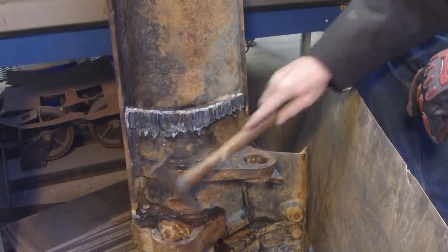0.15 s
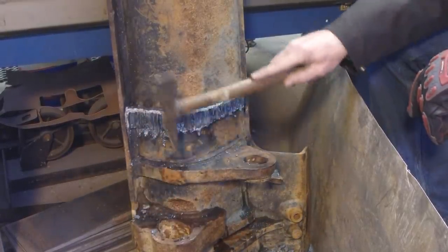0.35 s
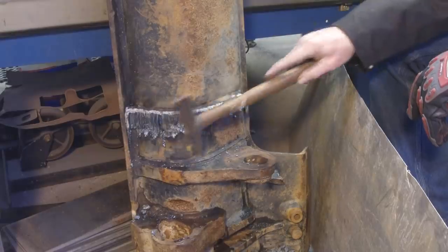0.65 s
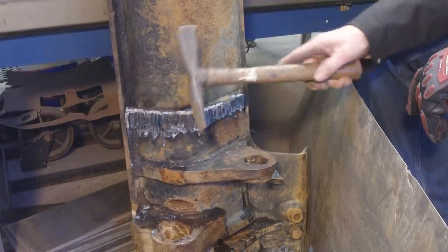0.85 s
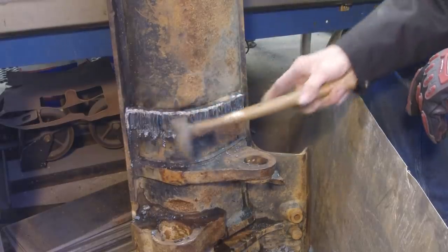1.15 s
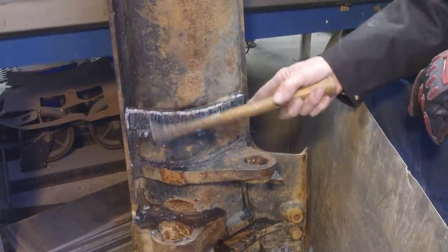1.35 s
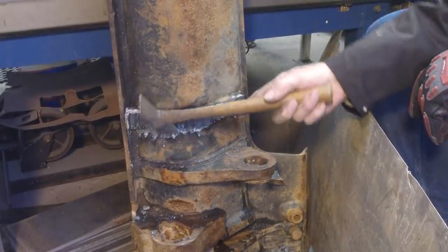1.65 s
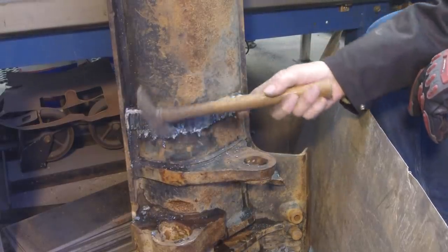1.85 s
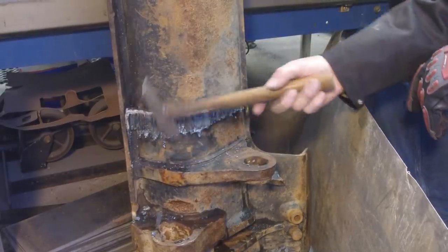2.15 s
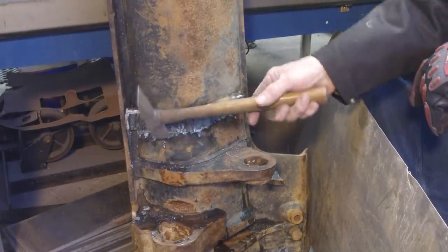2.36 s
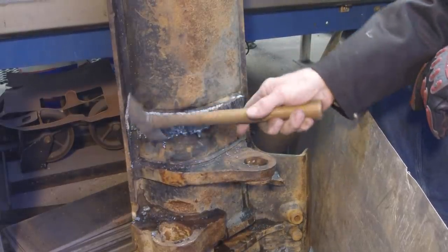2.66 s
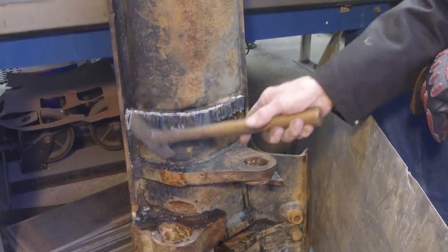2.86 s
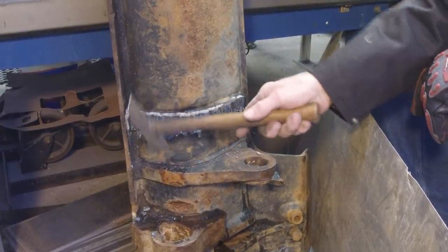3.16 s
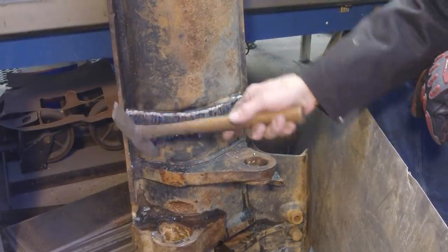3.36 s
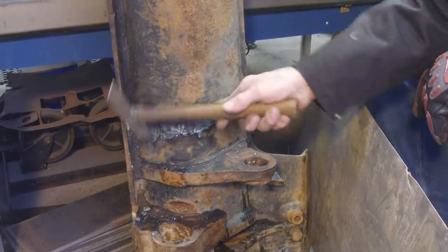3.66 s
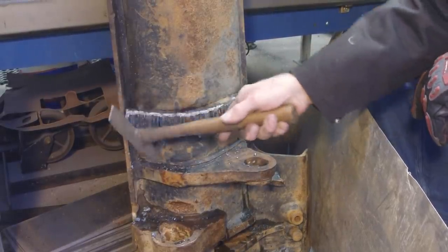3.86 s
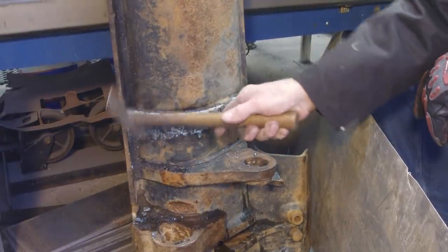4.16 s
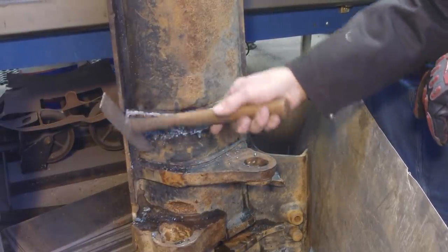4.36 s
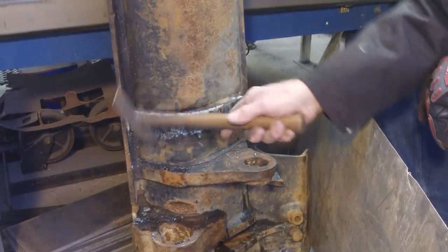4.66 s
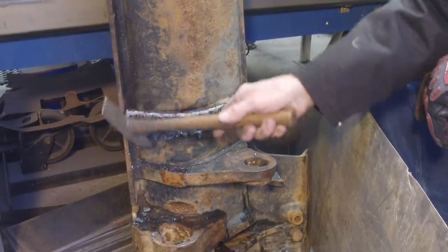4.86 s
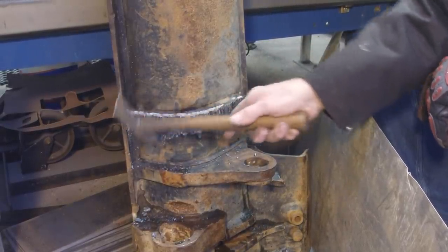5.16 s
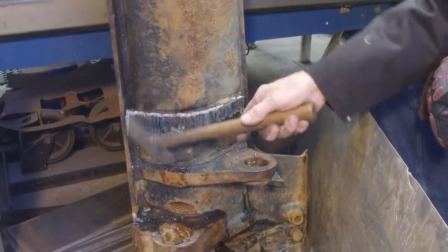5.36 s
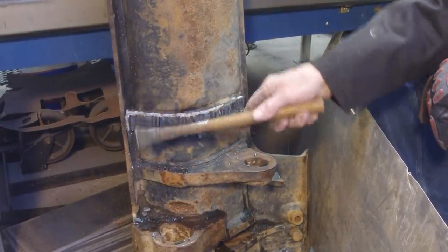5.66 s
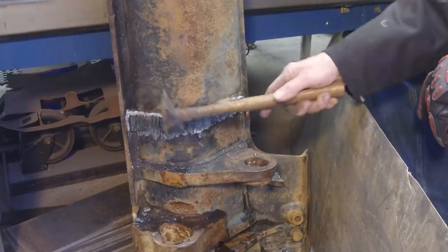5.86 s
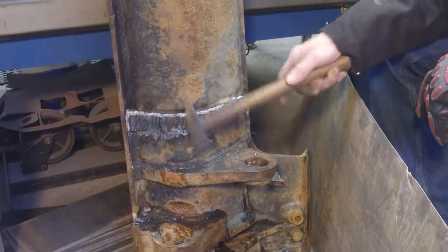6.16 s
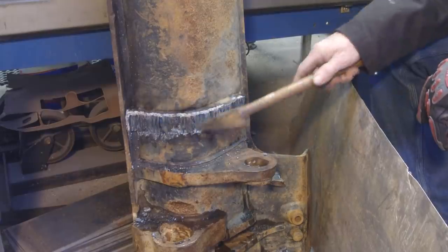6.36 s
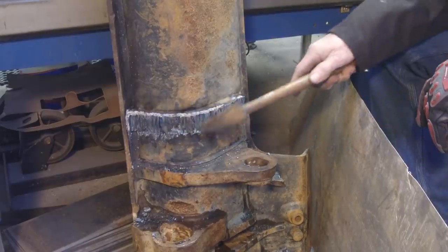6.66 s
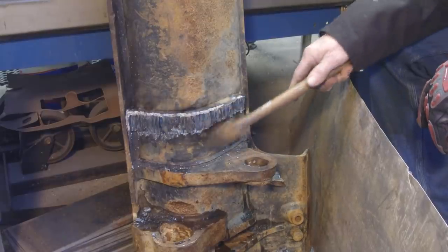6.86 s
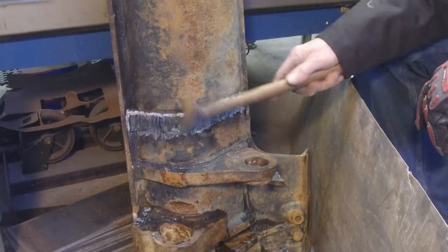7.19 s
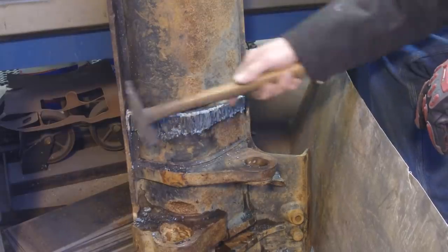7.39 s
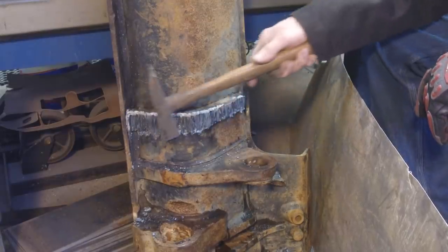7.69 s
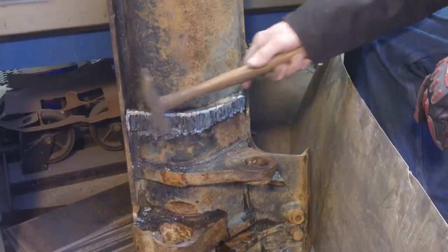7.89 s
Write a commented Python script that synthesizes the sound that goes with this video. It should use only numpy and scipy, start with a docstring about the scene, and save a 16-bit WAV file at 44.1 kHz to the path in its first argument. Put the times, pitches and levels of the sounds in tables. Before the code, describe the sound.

In a machine shop with low motor hum, a pointed chipping hammer strikes a thick steel pipe. A few loud, spaced clangs come first, then quick, brighter taps about four a second with small rebounds and crumbling slag. Louder, fuller blows follow with snapping chips and a spray of grit, and finally the point rattles and scrapes along the seam. Close single microphone.

```python
"""Chipping hammer on a welded steel pipe

A chipping hammer taps slag off a weld round a thick pipe in a machine shop, then is dragged along the seam.
Clicks drive the ringing modes of flange, pipe and hammer head; noise bands make the clang and crushed slag.
Dying noise bursts make chips and sprays of grit, uneven random clicks make the scrape.
Broad noise and a wavering low motor hum fill the shop, and the hum swells after each blow."""
import sys
import numpy as np
from scipy import signal
from scipy.io import wavfile

SR = 44100
rng = np.random.default_rng(int(sys.argv[2]) if len(sys.argv) > 2 else 0)


def materialize(psi):
    """Save the field psi as 16-bit PCM at rate SR to the path in sys.argv[1].

    A 1-D psi becomes a single channel; in a 2-D psi each row is a channel.
    """
    bounded = np.clip(np.atleast_2d(psi).T, -1, 1)
    quanta = np.round(bounded * 32767).astype(np.int16)
    wavfile.write(sys.argv[1], SR, quanta)


N = 354123

# every blow and rebound of the point: (time [s], force as pipe ring [dB], brightness as crack over ring [dB],
# head first modes [dB], head upper modes [dB], crushed slag [dB], thud [dB])
BLOW_TABLE = [(0.132, -41, 5, -45.5, -46, -27, -35), (0.2526, -13.5, -9.5, -38.5, -39, -69, -29.5),
              (0.6731, -9.5, -6, -30.5, -30.5, -17, -17), (0.814, -37.5, 7, -45, -62, -69, -36),
              (1.3613, -7.5, -7.5, -19.5, -28, -21, -18.5), (1.4178, -17.5, 2, -43, -32.5, -47, -40),
              (1.4353, -29, 13, -25.5, -47, -43, -50), (1.6015, -11, 0, -23.5, -32, -40, -23.5),
              (1.849, -21.5, 1, -30.5, -31, -31, -26.5), (2.1229, -15.5, -6.5, -29, -35.5, -43, -23.5),
              (2.161, -36, 16, -25, -32, -26, -33), (2.3788, -21.5, 13.5, -20, -40, -55, -30.5),
              (2.4496, -29.5, -21, -37, -50, -60, -27), (2.673, -24, 3.5, -30.5, -30, -22, -24),
              (2.9326, -14.5, 5.5, -27, -28.5, -20.5, -20.5), (2.9715, -15, -3.5, -42, -50, -53, -23),
              (3.1945, -15.5, -2.5, -39, -35, -35, -25.5), (3.2249, -19, 11, -36, -34, -40, -25.5),
              (3.4254, -17, -2.5, -30, -32.5, -35, -25.5), (3.4663, -17, -2.5, -31.5, -36.5, -25, -20),
              (3.686, -16, 8, -32, -28.5, -24, -27.5), (3.7184, -14, -4.5, -29.5, -31, -42, -22),
              (3.7269, -34, 6, -31.5, -49, -39, -24.5), (3.9206, -15.5, 8, -30.5, -30.5, -36, -26.5),
              (3.9909, -23.5, 8.5, -37, -42, -47, -28), (4.151, -23, 6, -30.5, -33.5, -53, -27.5),
              (4.4155, -15.5, 5.5, -32, -30.5, -39, -25), (4.6541, -16, 6, -26, -29.5, -53, -23.5),
              (4.9015, -15, 3, -28.5, -29, -23, -21.5), (5.1816, -13, 4.5, -32, -35, -46, -22),
              (5.2206, -26, 15.5, -49, -38, -48, -33), (5.2599, -26.5, 4, -35.5, -59, -55, -31.5),
              (5.4565, -20.5, 0.5, -32.5, -46, -49, -26.5), (5.4795, -18, 2.5, -39, -35, -29, -31),
              (5.533, -20.5, -1.5, -45, -63, -69, -25.5), (5.7304, -20.5, -6, -28.5, -36.5, -19, -23.5),
              (6.0228, -26, -3, -33, -45, -40, -28.5), (6.03, -23, 3, -21.5, -28.5, -26, -29),
              (6.3223, -42, 5, -35, -33.5, -25, -33), (6.3312, -18, 4, -26.5, -31, -22, -26),
              (6.652, -7, -11, -31.5, -40, -44, -17), (6.9166, -7, -1.5, -19, -34.5, -52, -16.5),
              (7.1723, -10.5, -2.5, -21, -26, -53, -17), (7.233, -20.5, 0.5, -49, -52, -35, -41),
              (7.3956, -33, -16, -33, -37, -57, -34), (7.418, -27, -5, -35, -41, -57, -32),
              (7.4308, -29, 3, -29.5, -39, -50, -37), (7.4594, -25.5, -5, -34, -34, -43, -34),
              (7.4908, -32.5, 11, -61, -48, -55, -31.5), (7.5478, -43, 23, -62, -33.5, -53, -34),
              (7.6644, -22, -1.5, -50, -51, -62, -39), (7.6958, -27.5, 8, -36, -31.5, -51, -33),
              (7.7615, -16, -4.5, -42, -38, -52, -30), (7.858, -23.5, -12, -38, -42, -62, -34.5),
              (7.8961, -24, -5, -36.5, -33.5, -53, -28.5), (7.957, -28.5, 2, -33, -35, -59, -37)]
# brittle chips snapping off or landing: (time [s], level [dB])
CHIP_TABLE = [(1.485, -35), (2.502, -33), (5.1075, -38), (6.331, -15.5), (6.397, -23), (6.941, -22.5),
              (7.1172, -56), (7.215, -25)]
# slag crusts bursting into sprays of grit: (time [s], level [dB], t60 [s])
SPRAY_BURSTS = [(2.159, -29, 0.068), (3.708, -30.5, 0.12), (3.961, -34, 0.13), (4.1644, -43.5, 0.35),
                (4.4363, -34, 0.13), (4.6828, -36.5, 0.23), (5.8371, -49.5, 0.17), (6.726, -29.5, 0.53),
                (7.4889, -46, 0.13), (7.7064, -44, 0.35)]
# colour of the grit: (frequency [Hz], level [dB per Hz])
GRIT_SPECTRUM = [(1470, -37), (2500, -14), (3080, 14.5), (3720, 14.5), (13500, 14.5), (15600, -8),
                 (16000, -32)]
# pressure of the point dragged along the seam: (time [s], level [dB])
DRAG_PRESSURE = [(7.38, -62), (7.506, -41), (7.622, -45.5), (7.728, -37), (7.83, -49), (8.03, -47)]
# ringing modes of the pipe wall: (frequency [Hz], level [dB], t60 [s])
PIPE_MODES = [(241.7, -14.5, 0.24), (291.7, -8.5, 0.25), (364.5, -11.5, 0.53), (549.6, -13, 0.46),
              (580.8, -7, 0.21), (653, -7, 0.15), (697.5, -7, 0.28), (722.5, -10.5, 0.46), (781, -17, 0.54),
              (973, -9.5, 0.11), (1077, -10, 0.12), (1124, -6.5, 0.16), (1208, -13, 0.22),
              (1262, -21, 0.37), (1500, -10.5, 0.25), (1594, -17, 0.4), (1656, -10, 0.19),
              (1752, -6.5, 0.11), (1801, -10.5, 0.27), (1878, -10.5, 0.094), (1935, -10, 0.13),
              (2200, -38, 0.083), (2153, -13, 0.18), (2202, -13.5, 0.093), (2344, -16, 0.13),
              (2395, -10, 0.12), (2560, -18.5, 0.065), (2768, -20.5, 0.14), (3872, -20, 0.088)]
# ringing modes of the flange, lower down, where the first blows land: (frequency [Hz], level [dB], t60 [s])
FLANGE_MODES = [(360, -6.5, 0.59), (564.5, -4, 0.21), (722, -8.5, 0.43), (762, -11, 0.38), (962, -4, 0.22),
                (1053, -9, 0.055), (1117, 0, 0.19), (1260, -36, 0.11), (1500, -16, 0.41), (1798, -12, 0.27),
                (2320, -13, 0.12), (2554, -4.5, 0.065), (3830, -3.5, 0.027)]
# hammer head modes, the first ones in a beating cluster: (frequency [Hz], level [dB], t60 [s])
HEAD_MODES = [(4160, -18, 0.045), (4750, -33, 0.068), (4490, -5, 0.1), (4561, -3, 0.11), (4616, -16, 0.094),
              (7755, -5, 0.076), (7885, -15.5, 0.049), (8760, -5, 0.028), (9230, -13.5, 0.058),
              (13450, -4.5, 0.037)]
# dense overtones of pipe, flange and shop that blur into noise: (frequency [Hz], level [dB per Hz])
CLANG_SPECTRUM = [(120, 3.5), (400, 8.5), (1000, -1), (2000, -4), (3200, -14), (4200, -11), (6000, -11),
                  (11000, -19.5), (15000, -16)]
# how long those overtones last: (frequency [Hz], t60 [s])
CLANG_DECAY = [(100, 0.58), (420, 0.48), (1100, 0.31), (2900, 0.32), (7700, 0.16), (15000, 0.055)]
# colour of the shop noise: (frequency [Hz], level [dB per Hz])
SHOP_SPECTRUM = [(15, -46), (25, -34), (102, 11.5), (170, -9.5), (373, -4.5), (489, -12), (714, -4.5),
                 (840, -11.5), (1130, -18.5), (3340, -29.5), (4610, -32.5), (5280, -32), (13600, -33.5),
                 (15200, -40), (16000, -60)]
# resonances of the motor hum: (frequency [Hz], width [Hz], level within the hum [dB])
HUM_RESONANCES = [(82.84, 3.1, -6.5), (106.2, 4.2, -7.5), (120.84, 2.6, -3), (211.5, 7.9, -9.5)]
# level of the low hum before the blows swell it: (time [s], level [dB])
HUM_CURVE = [(0, -35), (0.1, -53), (0.16, -30.5), (0.5, -44.5), (1.3, -43.5), (1.37, -37), (1.66, -35),
             (1.76, -46.5), (1.92, -38.5), (2.5, -41.5), (5.0, -42.5), (8.03, -45)]

SHOP_DB = -45  # rms of the broad shop noise
BOOM_DB, BOOM_T60_S = -16, 0.66  # each blow shakes the bench, which booms on the hum's pitches
FLANGE_UNTIL_S = 1.0
ECHO_T60_S = 0.28
KNOCK_FOLLOWS = 0.36  # share of the brightness that the contact knock gains on top
HIGH_DB, HIGH_FOLLOWS = -3.5, 0.32  # the high pipe modes follow a share of the brightness
TOP_DB, TOP_SLAG_SHARE = -7.5, 0.33  # the top head mode leans from the upper modes toward the slag
CUTOFF_HZ = 16500


def amp(db):
    """Decibels to gain."""
    return 10 ** (np.asarray(db) / 20)


def rms_one(x):
    """Scaled to rms 1."""
    return x / np.sqrt(np.mean(x ** 2) + 1e-20)


def at_hz(points, hz):
    """A table over frequency, read on a log-frequency axis."""
    table = np.array(points)
    return np.interp(np.log(hz), np.log(table[:, 0]), table[:, 1])


def clicks(times, sizes):
    """One sample per event, over a silent floor."""
    out = np.full(N, 1e-18)
    samples = (np.asarray(times) * SR).round().astype(int)
    np.add.at(out, np.minimum(samples, N - 1), sizes)
    return out


def fade(drive, t60):
    """Each click becomes an exponential fall that loses 60 dB in t60 seconds."""
    return signal.lfilter([1], [1, -amp(-60 / (t60 * SR))], drive)


def ring(drive, hz, t60):
    """A unit click sets a dying sine of starting height 1 ringing in a two-pole resonator."""
    r, w = amp(-60 / (t60 * SR)), 2 * np.pi * hz / SR
    return signal.lfilter([0, np.sin(w)], [1, -2 * r * np.cos(w), r * r], drive)


def dying(times, db, t60):
    """Envelope that jumps at each event and falls; powers of overlapping tails add."""
    power = fade(clicks(times, amp(db) ** 2), t60 / 2)  # power drops twice as many dB on this scale
    return np.sqrt(power)


def narrow(hz, width_hz):
    """Noise in one narrow resonance, rms 1."""
    t60 = np.log(1000) / (np.pi * width_hz)
    return rms_one(ring(rng.standard_normal(N), hz, t60))


def bands(envelope_at, low_hz):
    """Half-octave noise bands, each under the envelope that envelope_at(Hz) gives per Hz."""
    edges = low_hz * 2 ** np.arange(0, np.log2(19000 / low_hz), 0.5)
    white = rng.standard_normal((2, N))  # neighbouring bands take different noise
    out = 0
    for k, (low, high) in enumerate(zip(edges, edges[1:])):
        sos = signal.butter(2, [low, high], "band", fs=SR, output="sos")
        out = out + signal.sosfilt(sos, white[k % 2] * envelope_at(np.sqrt(low * high)))
    return out


def blow_db(hz):
    """Strength of every blow near one frequency: where and how the point lands sets the balance."""
    _, force, bright, _, _, crushed, thud = np.transpose(BLOW_TABLE)
    levels = [thud, force, force + HIGH_DB + HIGH_FOLLOWS * bright, force + bright, crushed]
    anchors_hz = [500, 1100, 1900, 3800, 11000]
    place = np.interp(np.log(hz), np.log(anchors_hz), np.arange(5))
    k = min(int(place), 3)
    return levels[k] + (place - k) * (levels[k + 1] - levels[k])


def strikes(s, db, signs, echo_db):
    """One click a blow, then a fading noise: reflections and chatter feed the ring and make it flutter."""
    chatter = dying(s, db, ECHO_T60_S) * rng.standard_normal(N)
    return clicks(s, signs * amp(db)) + amp(echo_db) * chatter


def struck(modes, hit, spread_db, grate):
    """Each blow marked in hit strikes every mode with a strength and sign of its own."""
    s = np.array(BLOW_TABLE)[hit, 0]
    chance = rng.normal(0, spread_db, (len(s), len(modes)))
    signs = rng.choice([-1, 1], chance.shape)
    out = 0
    for k, (hz, db, t60) in enumerate(modes):
        drive = strikes(s, blow_db(hz)[hit] + chance[:, k], signs[:, k], echo_db=-33.0)
        out = out + amp(db) * ring(drive + grate, hz, t60)
    return out


def shop():
    """Broad shop noise with a wavering motor hum of narrow resonances that swells after each blow."""
    noise = rms_one(bands(lambda hz: amp(at_hz(SHOP_SPECTRUM, hz)), low_hz=24.93))
    s, level_db = np.transpose(HUM_CURVE)
    steady = amp(np.interp(np.arange(N) / SR, s, level_db))
    boom = dying(np.array(BLOW_TABLE)[:, 0], blow_db(360) + BOOM_DB, BOOM_T60_S)
    hum = sum(amp(db) * narrow(hz, width) for hz, width, db in HUM_RESONANCES)
    return amp(SHOP_DB) * noise + np.hypot(steady, boom) * hum


def pipe(grate):
    """Modes of the flange ring first, then those of the pipe wall; the contact itself is a short knock."""
    s, _, bright = np.array(BLOW_TABLE)[:, :3].T
    on_flange = s < FLANGE_UNTIL_S
    flange = amp(-2.0) * struck(FLANGE_MODES, on_flange, spread_db=0.5, grate=0)
    wall = amp(-3.0) * struck(PIPE_MODES, ~on_flange, spread_db=2.0, grate=amp(-32) * grate)
    knock_db = blow_db(2100) + KNOCK_FOLLOWS * bright + 3.0
    knock = ring(clicks(s, amp(knock_db)), 2000, 0.0074)
    # steel gives a little: no sharp edge
    knock = signal.sosfilt(signal.butter(2, 5000, fs=SR, output="sos"), knock)
    return flange + wall + knock


def head(grate):
    """The hammer head sings its own high modes, damped by the hand."""
    s, _, _, first, upper, crushed, _ = np.transpose(BLOW_TABLE)
    top = TOP_DB + upper + TOP_SLAG_SHARE * (crushed - upper)
    chance = rng.normal(0, 1.5, (len(s), len(HEAD_MODES)))  # dB
    out = 0
    for k, (hz, db, t60) in enumerate(HEAD_MODES):
        strength_db = first if hz < 6000 else upper if hz < 11000 else top
        drive = strikes(s, strength_db + chance[:, k], 1, echo_db=-25.5)
        out = out + amp(db) * ring(drive + amp(-29.0) * grate, hz, t60)
    return out


def clang():
    """Blurred overtones die band by band under a brief crack; crumbling slag makes the treble crackle."""
    s = np.array(BLOW_TABLE)[:, 0]
    crumbs = fade((rng.random(N) < 160 / SR) * rng.exponential(1, N), 0.0051)  # about 160 a second

    def envelope_at(hz):
        """Tail and crack of every blow in one band."""
        crackle = 1 + crumbs * at_hz([(1000, 0.045), (4000, 1.26)], hz)
        tail = dying(s, blow_db(hz), at_hz(CLANG_DECAY, hz)) * crackle
        crack = dying(s, blow_db(hz) - 6.5, 0.028)
        return amp(at_hz(CLANG_SPECTRUM, hz)) * (tail + crack)
    return bands(envelope_at, low_hz=120.9)


def thump():
    """The heavy piece passes each blow on to the floor as one low mode, the more the lower it rings."""
    return amp(-5.0) * ring(clicks(np.array(BLOW_TABLE)[:, 0], amp(blow_db(360))), 29.6, 0.17)


def chips():
    """Brittle chips snap off or land: very short bursts of treble noise."""
    s, db = np.transpose(CHIP_TABLE)
    burst = rng.standard_normal(N) * dying(s, db, 0.014)
    return signal.sosfilt(signal.butter(2, 6000, "high", fs=SR, output="sos"), burst)


def sprays():
    """Slag crusts burst into grit: dying hiss with a patter of coarser crumbs."""
    envelope = np.sqrt(sum(dying([s], db, t60) ** 2 for s, db, t60 in SPRAY_BURSTS))
    envelope = signal.lfilter([1 / 150], [1, 1 / 150 - 1], envelope)  # the burst swells over a few ms
    grit = bands(lambda hz: amp(at_hz(GRIT_SPECTRUM, hz)), low_hz=1820)
    landings = (rng.random(N) < 400 / SR) * rng.exponential(0.25, N)  # about 400 a second
    patter = 1 + fade(landings, 0.01)  # coarser crumbs stand out of the hiss
    return envelope * rms_one(grit * patter)


def grating():
    """The dragged point trips over the weld ripples: uneven random clicks under the pressure curve."""
    s, db = np.transpose(DRAG_PRESSURE)
    press = amp(np.interp(np.arange(N) / SR, s, db, left=-200))  # silent before the drag
    sizes = amp(6.9 * np.minimum(rng.exponential(1, N), 4)) * rng.choice([-1, 1], N)
    trips = rng.random(N) < 1200 / SR  # about 1200 a second
    return press * rms_one(sizes * trips)


def drag_hiss(grate):
    """The hiss of the dragged point: its clicks through a broad band."""
    sos = signal.butter(1, [700, 5000], "band", fs=SR, output="sos")
    return amp(-10) * signal.sosfilt(sos, grate)


def scene():
    """All sources at one microphone; the dragged point also rings pipe and head."""
    grate = grating()
    blows = pipe(grate) + head(grate) + clang() + thump()
    debris = chips() + sprays()
    return (shop() + blows + debris + drag_hiss(grate))[None]


def record(dry):
    """Peaks are rounded, the top is cut."""
    rounded = 0.75 * np.tanh(dry / 0.75)
    return signal.sosfilt(signal.cheby2(18, 60, CUTOFF_HZ, fs=SR, output="sos"), rounded)


dry = scene()
out = record(dry)
materialize(out)
```